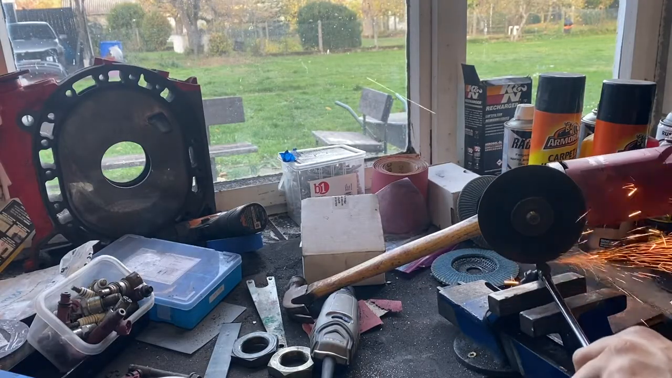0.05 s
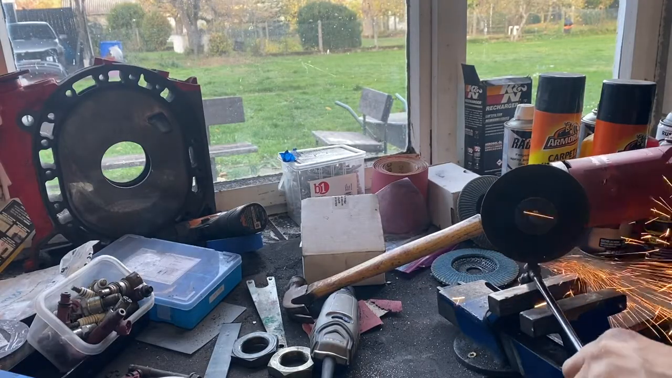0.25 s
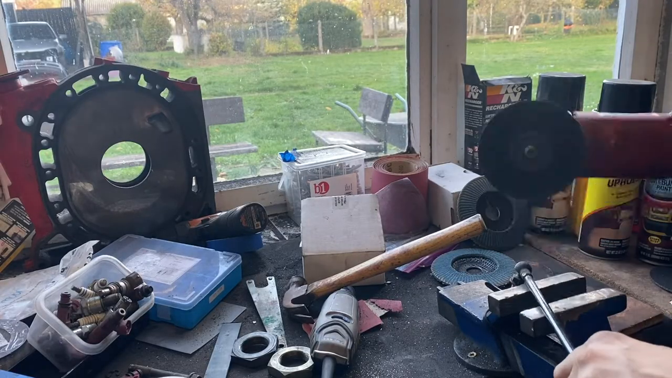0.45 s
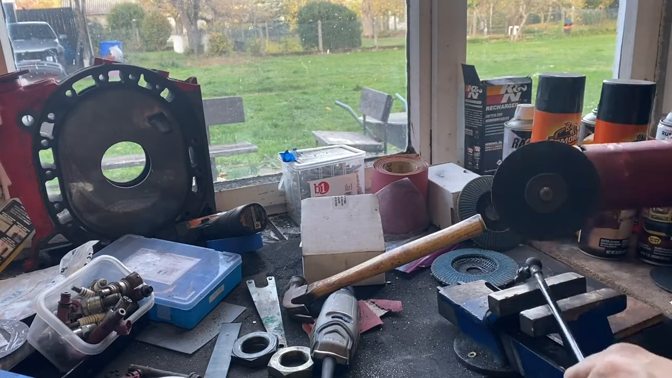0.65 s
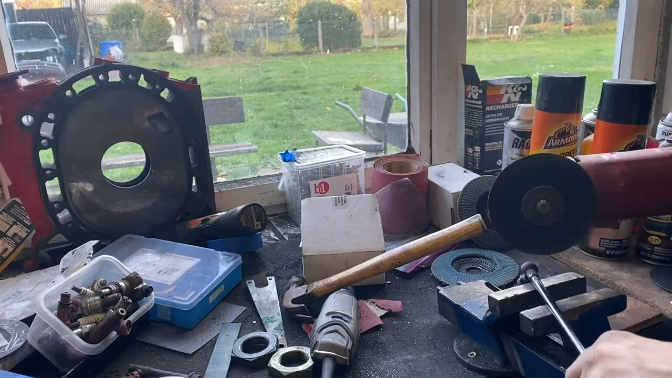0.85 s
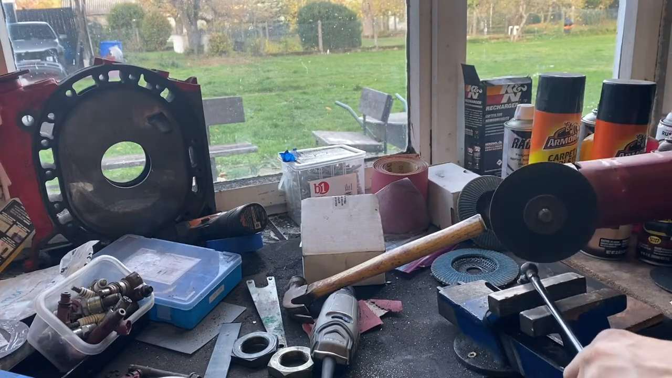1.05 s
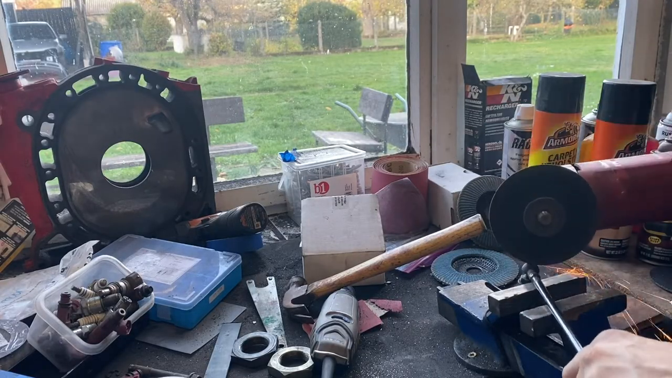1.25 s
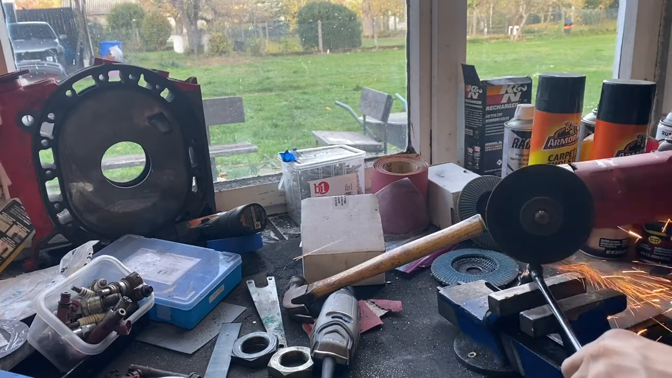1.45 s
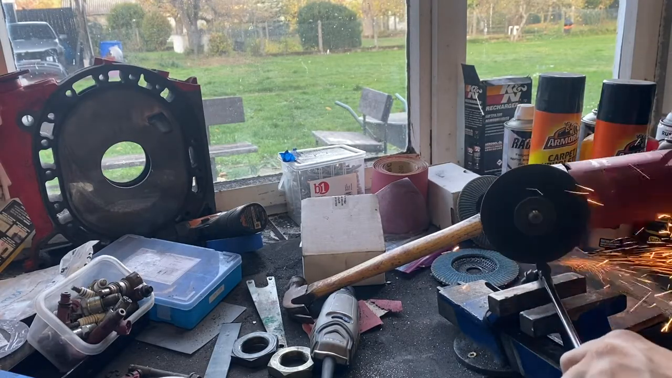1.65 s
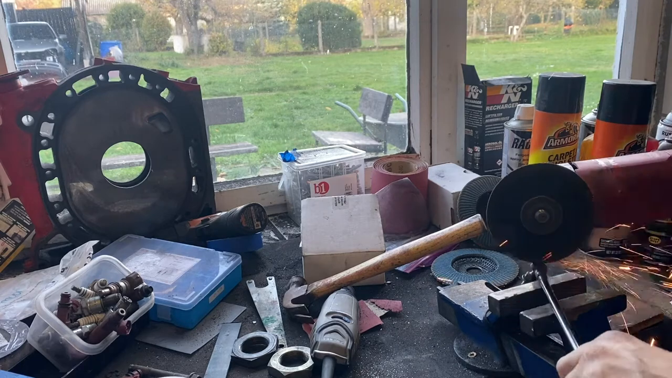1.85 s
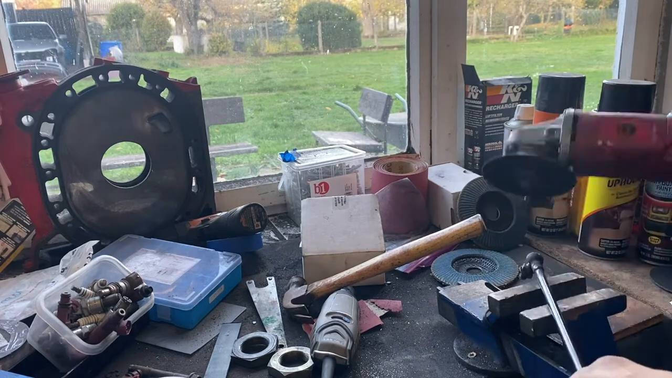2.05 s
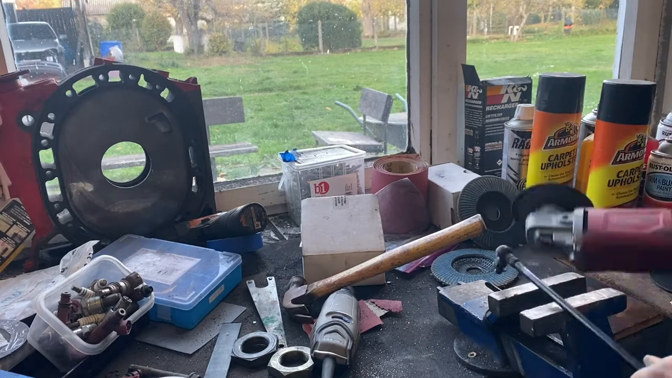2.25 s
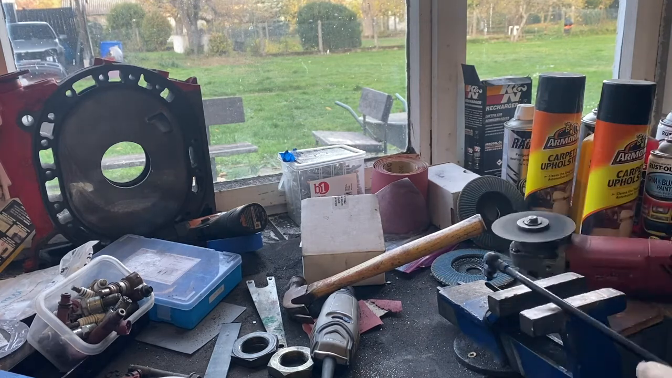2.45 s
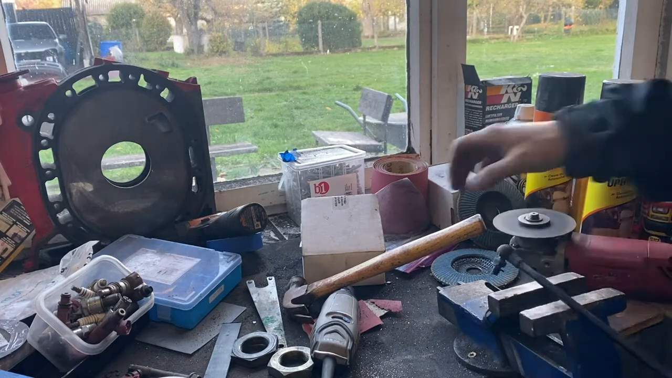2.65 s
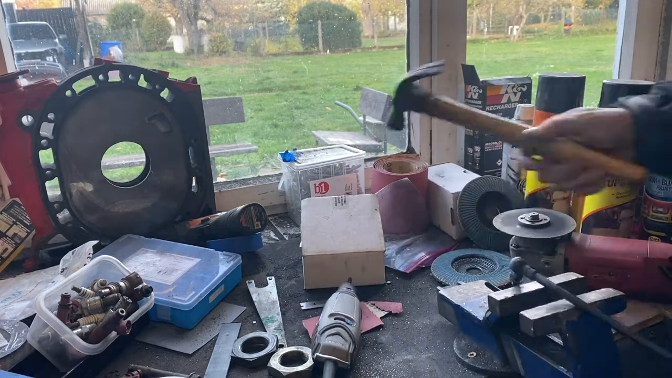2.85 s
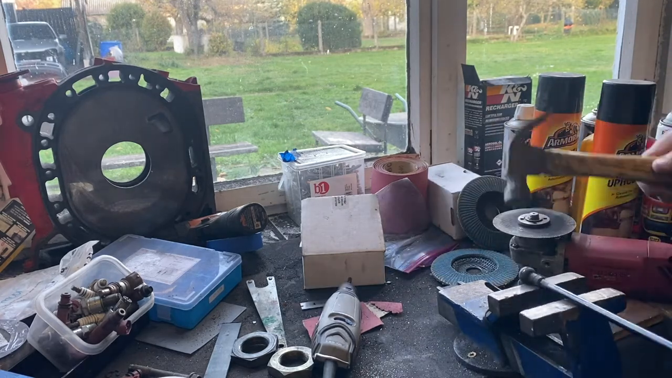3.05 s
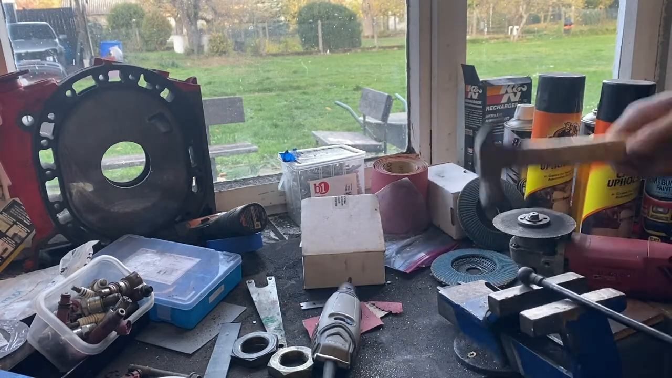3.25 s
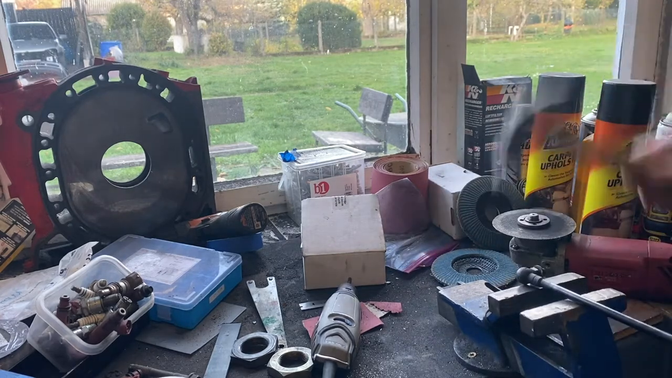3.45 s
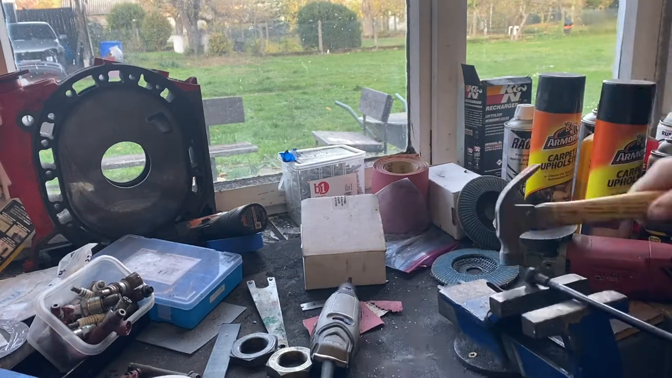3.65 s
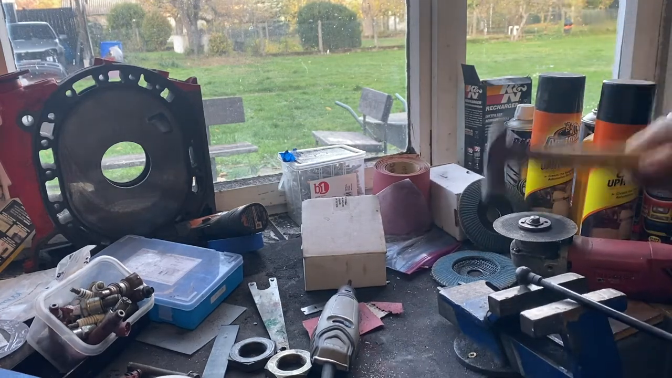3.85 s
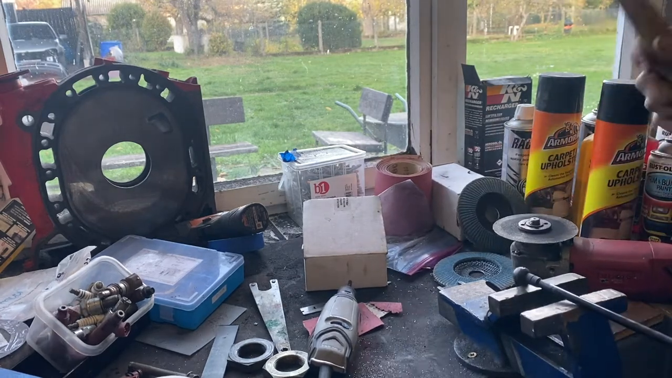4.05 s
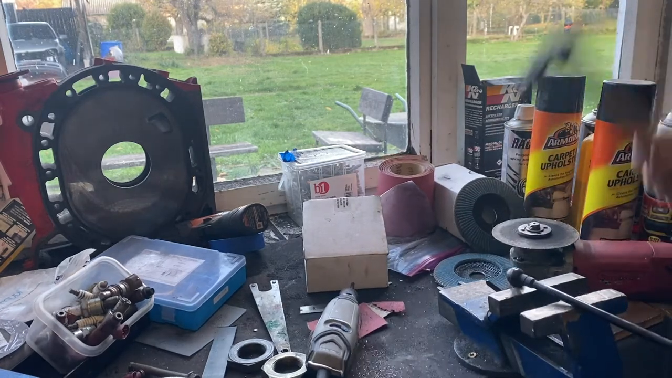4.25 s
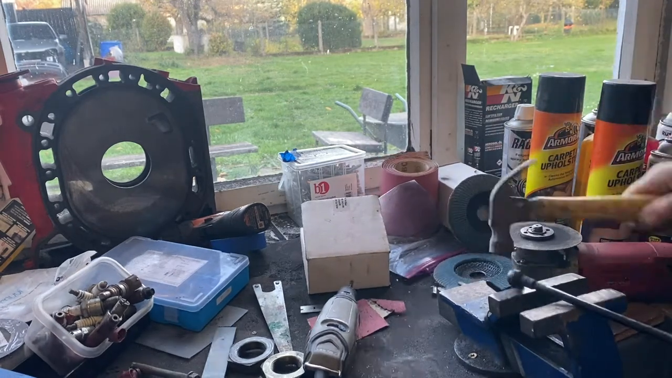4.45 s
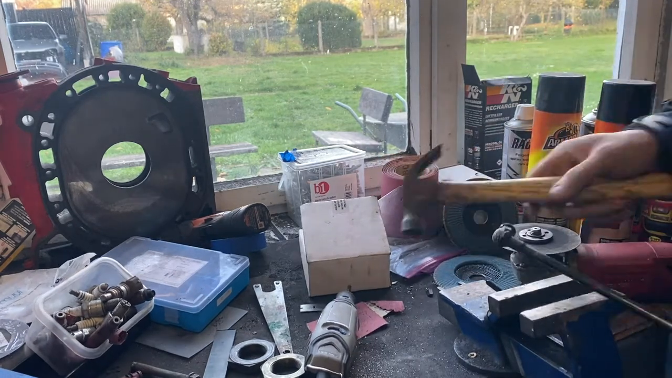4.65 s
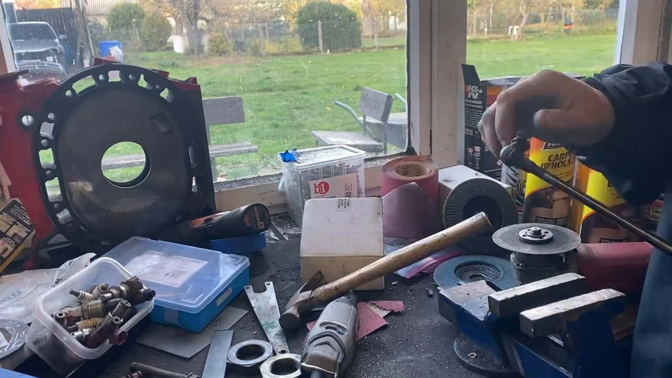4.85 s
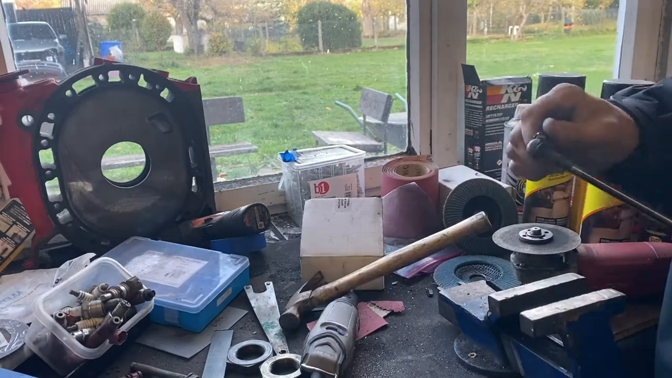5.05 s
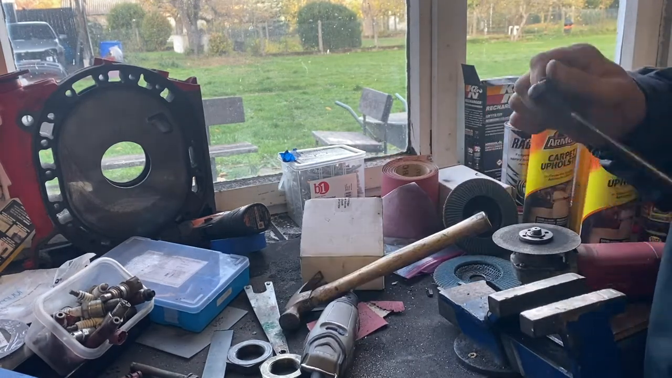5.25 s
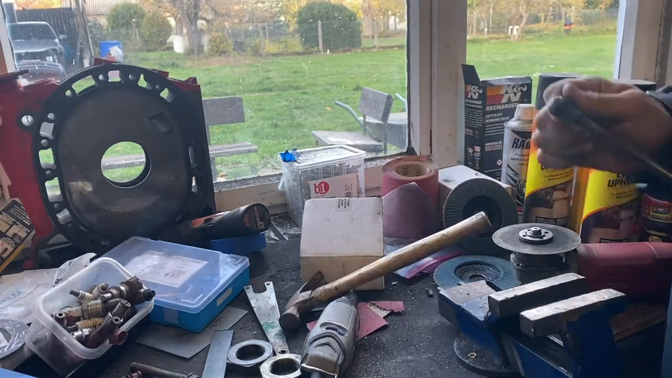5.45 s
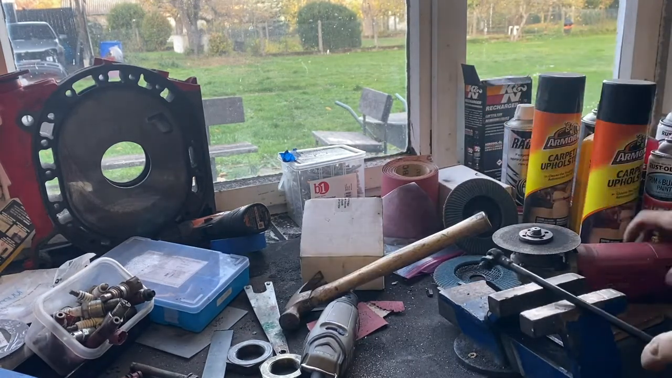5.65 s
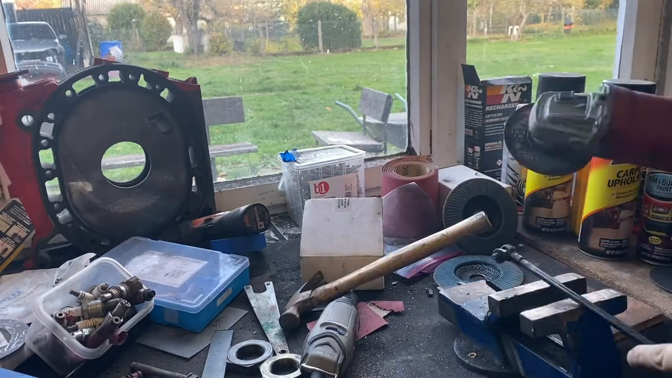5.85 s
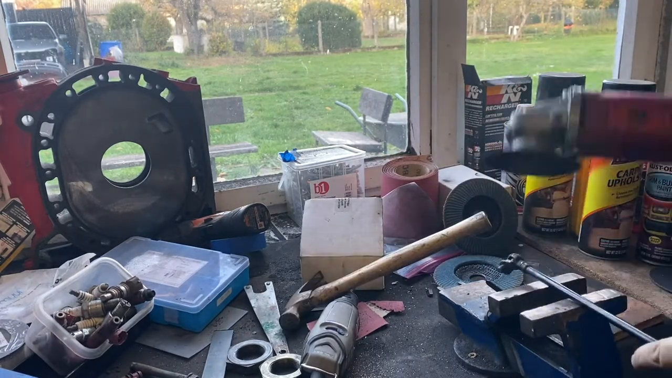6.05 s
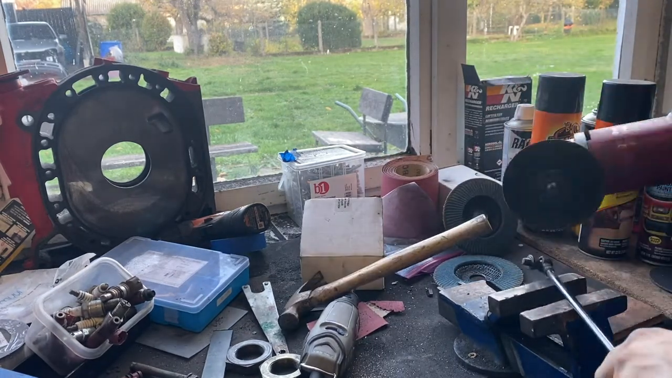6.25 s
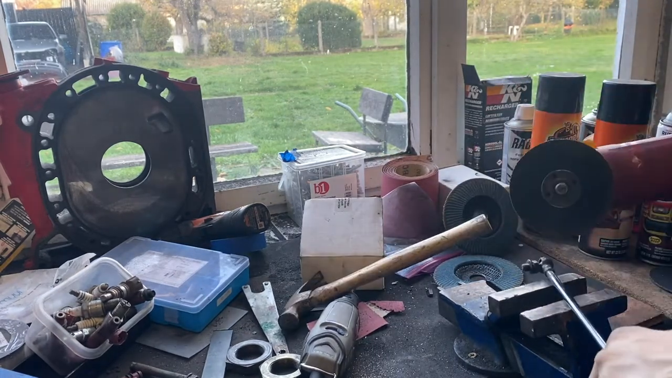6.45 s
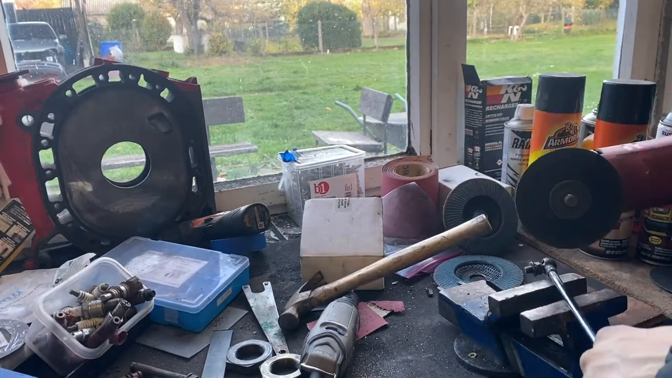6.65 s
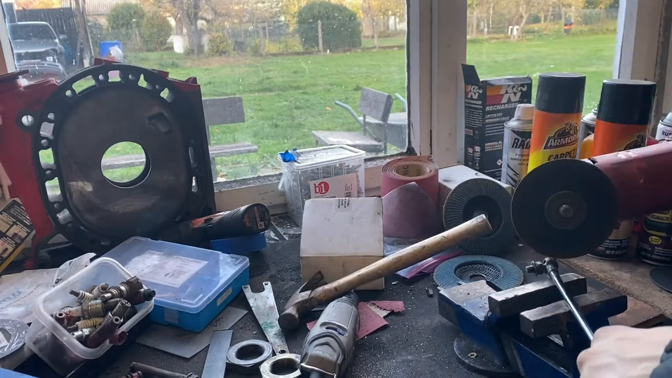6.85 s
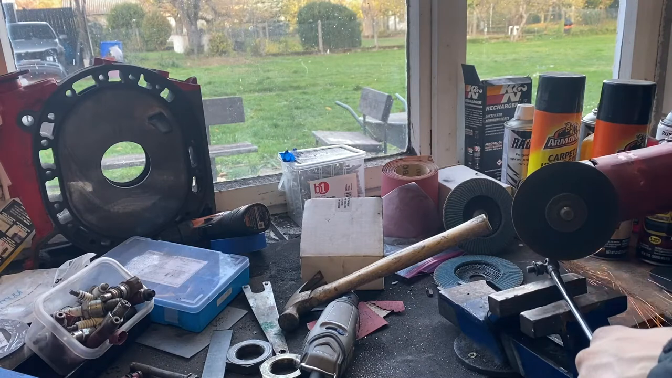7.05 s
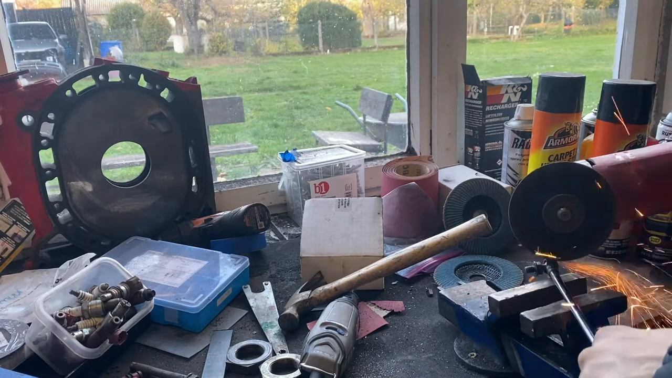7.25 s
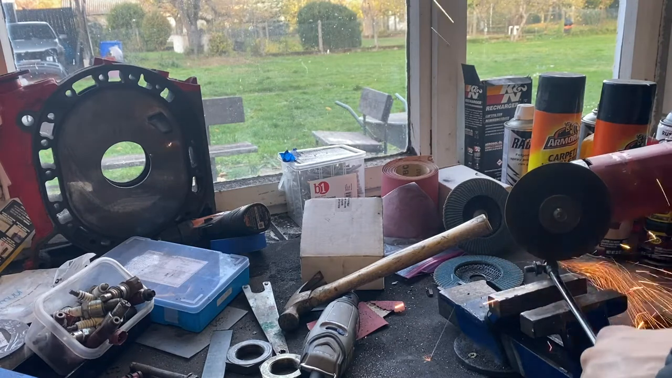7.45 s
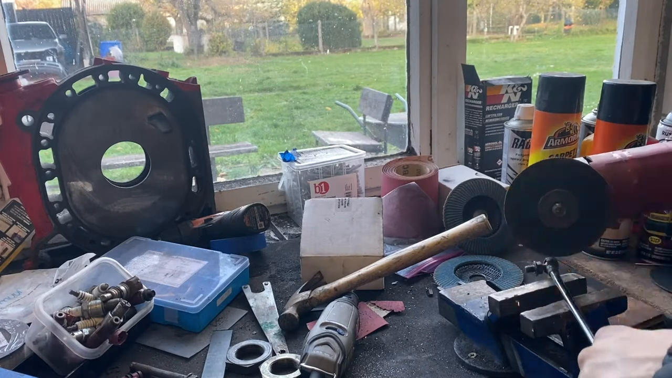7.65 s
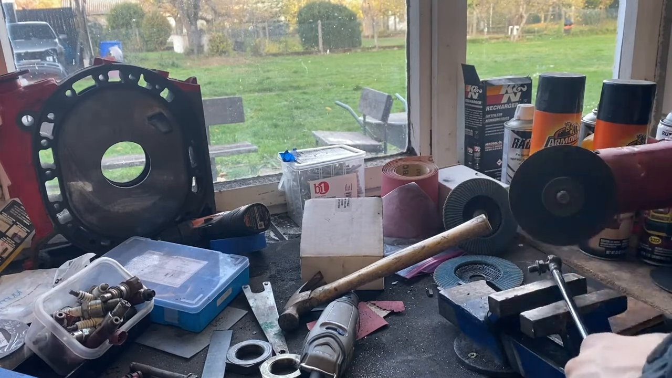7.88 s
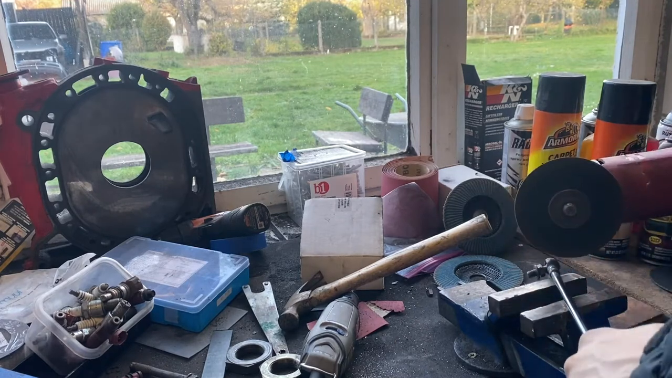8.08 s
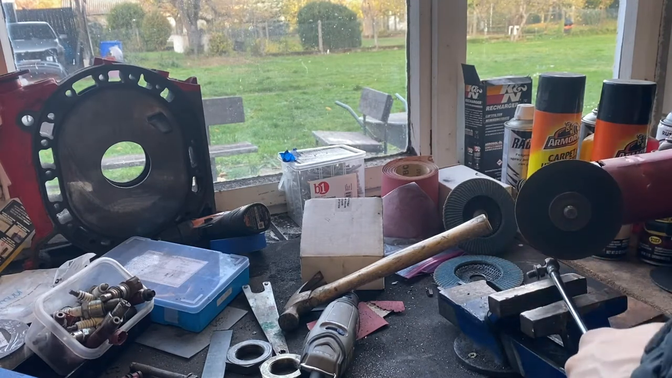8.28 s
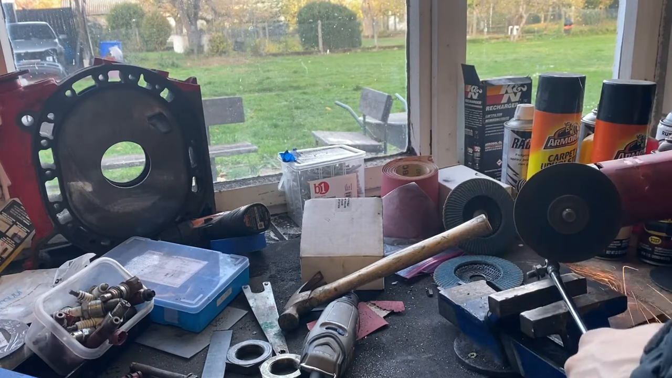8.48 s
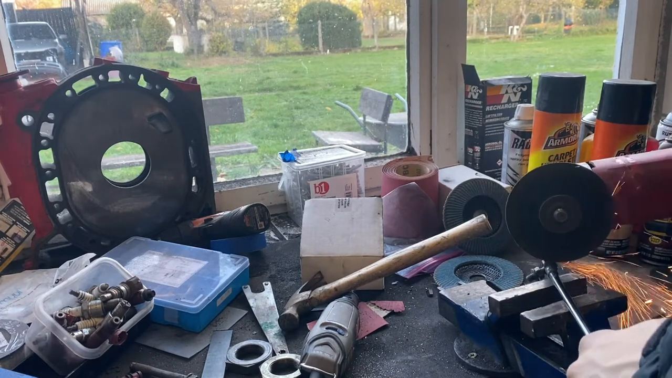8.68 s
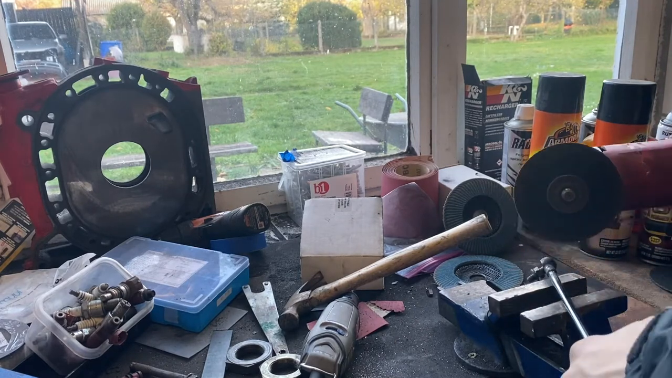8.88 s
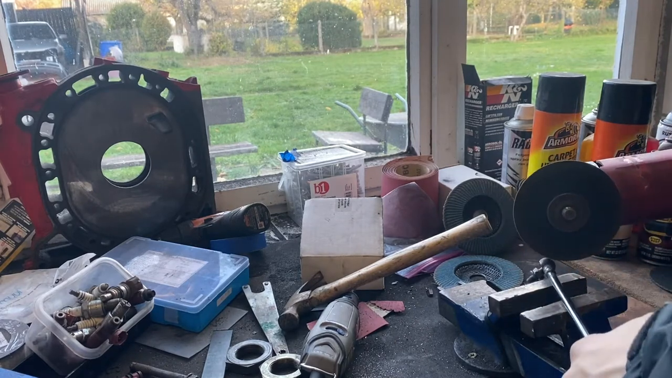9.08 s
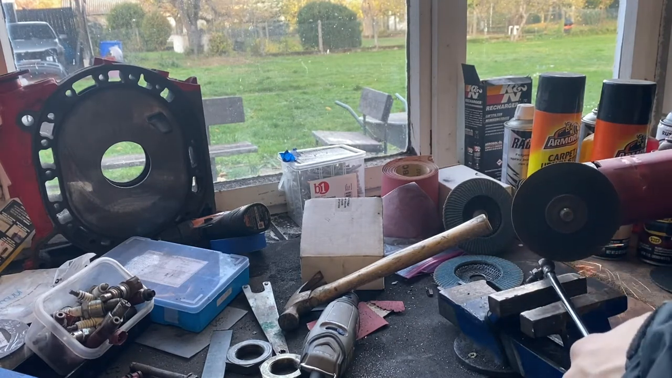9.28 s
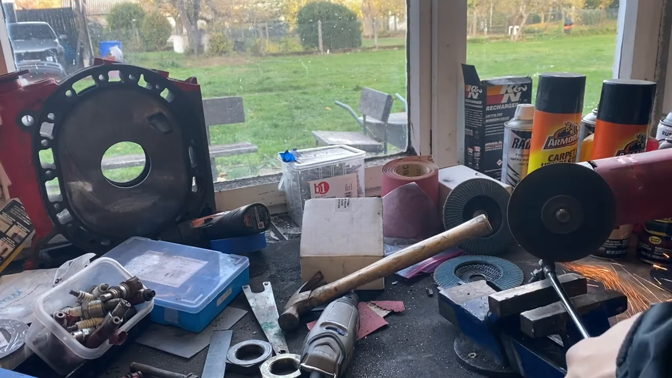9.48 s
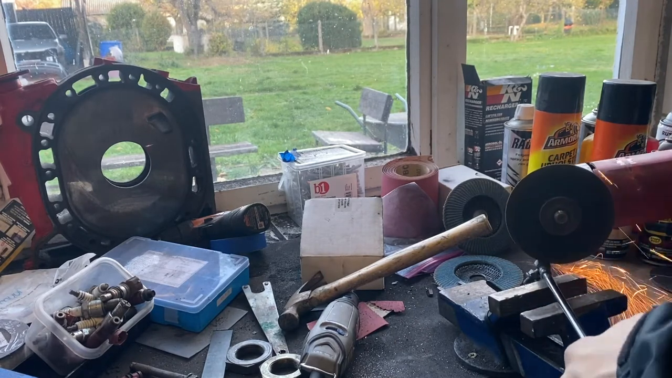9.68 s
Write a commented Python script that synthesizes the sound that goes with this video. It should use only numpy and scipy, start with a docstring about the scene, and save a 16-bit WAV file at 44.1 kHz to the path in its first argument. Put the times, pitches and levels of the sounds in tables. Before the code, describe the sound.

Harsh grinder cuts on clamped steel, a rattling coast to rest, a burst of fast hammering on a clattering bench, then whining grinding again.

```python
"""An angle grinder is heard biting a steel rod in a vise in a small workshop; it bites again and is laid down.
Quick hammer blows shake the bench, the hammer is dropped, and the grinder starts again for three more bites.
Fan air, hum and gear whine follow the motor's computed speed; grit noise rings the disc while it cuts.
Blows and knocks are decaying noise and ringing modes; a stereo microphone hears it all over a quiet room."""
import sys
import numpy as np
from scipy import signal
from scipy.fft import rfft, irfft, next_fast_len
from scipy.io import wavfile
from scipy.ndimage import map_coordinates

SR = 44100
rng = np.random.default_rng(int(sys.argv[2]) if len(sys.argv) > 2 else 0)


def transcribe(u):
    """Save the signal u as a 16-bit wav file named by the first command-line argument.

    u: samples, shape (n,) or (channels, n), limited to [-1, 1]; the rate is SR.
    q: integer samples, one column per channel.
    """
    v = np.clip(np.atleast_2d(u).T, -1, 1)
    q = np.round(v * 32767).astype(np.int16)
    wavfile.write(sys.argv[1], SR, q)


N = 428652
TIME = np.arange(N) / SR  # seconds
TOP_HZ = 16300  # the microphone's band limit

# Grinder switched on and held: on_s, off_s, level_db, surge_db (extra at the start), surge_length_s,
# strain_db (extra hum under the strain of starting)
RUNS = [(-1, .5, 0, 0, .5, 0), (.792, 1.955, 0, 4.5, .7, .5), (6.526, 10, .7, 5.1, .6, 3.5)]
FREE_HZ = 167.3  # disc turns a second in free air
SPIN_UP_S, COAST_S = .052, .5  # time constants with the power on and off
SPIN_UP_SHAPE = .78  # under 1: a leap at first, then a creep up to full speed
FRICTION_HZ, STALL_HZ = 24, 11  # dry friction stops the disc; its noise fades out below the stall speed


def unloaded_speed():
    """Turns a second: the motor nears its free speed while on, then coasts against drag and dry friction."""
    speed = np.zeros(N)
    for on, off, *_ in RUNS:
        driven_s, coasted_s = np.clip(TIME - on, 0, off - on), np.maximum(TIME - off, 0)
        approach = np.exp(-(driven_s / SPIN_UP_S) ** SPIN_UP_SHAPE)
        reached = FREE_HZ + (np.interp(on, TIME, speed) - FREE_HZ) * approach
        coasted = (reached + FRICTION_HZ) * np.exp(-coasted_s / COAST_S) - FRICTION_HZ
        speed = np.where(TIME < on, speed, np.maximum(coasted, 0))
    return speed


def still_turning(speed):
    """Share of the running noise left as the disc comes to rest."""
    return np.clip(speed / STALL_HZ, 0, 1) ** 2


def run_gain():
    """Each run starts with a surge in loudness that holds briefly and settles to the run's own level."""
    db = np.zeros(N)
    for on, _, level_db, surge_db, length, _ in RUNS:
        surge = surge_db / (1 + np.abs((TIME - on) / length) ** 5)
        db = np.where(TIME < on, db, level_db + surge)
    return amp(db)


# Air noise laws: driven_db, driven_power_of_speed, free_fan_db, free_fan_power_of_speed
RUSH_LAW = (-49, 4.5, -35.5, 0.9)
HISS_LAW = (-36.5, 2.06, -34.5, 0.64)


def air_gain(law, speed, power):
    """Air noise grows with a power of speed, with one law added while driven and one whenever the fan turns."""
    driven_db, driven_power, free_db, free_power = law
    pace = speed / FREE_HZ
    driven = amp(driven_db) * power * pace ** driven_power
    free = amp(free_db) * pace ** free_power
    return still_turning(speed) * run_gain() * (driven + free)


# Low and high fan air spectra: freq_hz, level_db (per Hz, relative)
RUSH = [(25, -39.5), (60, -23), (130, -15.5), (300, -7), (430, -2), (700, -4), (1200, -0.5), (2000, 1.5),
        (3000, -2.5), (5000, -17.5), (10000, -41)]
HISS = [(700, -33.5), (1700, -8), (2600, 1.5), (3300, 0.5), (4400, 0), (6500, 0), (8500, -2.5),
        (11500, -4.5), (14000, -7.5), (15700, -13), (16100, -45)]
CROWN_TEETH, PINION_TEETH = 36, 11  # the bevel gear between disc and armature


def fan_air(speed, power, turn):
    """The fan blows a low rush and a high hiss; the hiss pulses once per armature turn."""
    rush = air_gain(RUSH_LAW, speed, power) * amp(0.99 * wobble(30)) * spread(colour(RUSH))
    pulse = 1 + 0.32 * np.cos(turn * CROWN_TEETH / PINION_TEETH)
    hiss = air_gain(HISS_LAW, speed, power) * amp(0.68 * wobble(60)) * spread(colour(HISS), pulse)
    return rush + hiss


# Gear train tones: turn_multiple (rounded to whole), level_db (relative), power_of_speed
WHINE = [(21, -22, 2), (24, -24.5, 2), (36, -12, 20), (71.7, -14.5, 0.3)]
WHINE_LIFT_DB_PER_HZ = 1.5  # added per turn a second lost to the cut, against the fall with load and speed


def gear_whine(speed, power, load, turn):
    """Gear tones at whole multiples of the disc turn follow the hiss level and their own powers of speed."""
    pace = speed / FREE_HZ
    tones = 0
    for multiple, db, grows in WHINE:
        tones += amp(db + 3.2 * wobble(18)) * pace ** grows * np.sin(round(multiple) * turn)
    gain = air_gain(HISS_LAW, speed, power) * amp(-3.5 - 5 * load + WHINE_LIFT_DB_PER_HZ * sag())
    return np.sqrt(2) * tones * gain


# The hum and its overtones, in order: level_db
HUM_HARMONICS_DB = [0, -10, -12.5]
HUM_DB, HUM_SKIM_DB, HUM_DIG_DB = -38.5, -11.5, -4  # in free air; changes while skimming and dug in
GRAB_HUM_DB, GRAB_ARMATURE_DB = 8, -3.5  # as the disc grabs, the hum swells and the armature tone chokes
STRAIN_S, HUM_CUT_HZ = 0.17, 365  # the start strains this long; the housing radiates little hum below the cut


def spindle_hum(speed, power, load, dug, grab):
    """The spindle hums three times a turn, clean at full speed, shuddering once the disc is dragged down."""
    pace, hum_hz = speed / FREE_HZ, 3 * speed
    shudder = (.012 + 0.024 * dug + 0.18 * (1 - pace)) * wobble(140)
    strain_db = sum(db * held(on, on + STRAIN_S, BITE_ATTACK_S, RECOVER_S) for on, *_, db in RUNS)
    driven = power / (1 + (HUM_CUT_HZ / (hum_hz + 1)) ** 16)
    coasting = (1 - power) * amp(-5) * pace ** 2
    cut_db = GRAB_HUM_DB * grab + HUM_SKIM_DB * (load - dug) + HUM_DIG_DB * dug
    gain = (driven + coasting) * amp(HUM_DB + strain_db + cut_db + 1.4 * wobble(35))
    turn = phase(hum_hz * (1 + shudder))
    tones = sum(amp(db) * np.sin(k * turn + [[.35], [-.35]]) for k, db in enumerate(HUM_HARMONICS_DB, 1))
    return np.sqrt(2) * run_gain() * gain * tones


ARMATURE_DB, ARMATURE_DIG_DB = -38.5, -5  # tone while skimming before the surge; its change when dug in


def armature_tone(speed, load, dug, grab):
    """Under load the armature sounds at its own turning rate, geared up from the disc."""
    turn = phase(speed * CROWN_TEETH / PINION_TEETH * (1 + .005 * wobble(70)))
    level_db = ARMATURE_DB + ARMATURE_DIG_DB * dug + GRAB_ARMATURE_DB * grab + 2.0 * wobble(25)
    return np.sqrt(2) * run_gain() * load * amp(level_db) * np.sin(turn + [[.35], [-.35]])


def motor(speed, power, load, dug):
    """The fan, gears, spindle and armature share one speed, which grows unsteady under load."""
    unsteady = (.0026 + .003 * load) * wobble(70) + .012 * dug * wobble(160)
    turn = phase(speed * (1 + unsteady))
    grab = 0
    for start, _, _, _, skim, *_, length in BITES:
        grab += held(start + skim, start + skim + length, BITE_ATTACK_S, BITE_RELEASE_S)
    air = fan_air(speed, power, turn) + gear_whine(speed, power, load, turn)
    return air + spindle_hum(speed, power, load, dug, grab) + armature_tone(speed, load, dug, grab)


# The disc skims the steel, then digs in: start_s, end_s, ring_db, sizzle_db, skim_length_s, drone_db,
# lost_turns_hz (when dug in), shock_db (ring change at first contact), grab_length_s; layers trimmed below
BITES = [(-.5, 0.422, -27, -31, .3, -39.5, 14.3, -1.5, .05),
         (1.203, 1.913, -27, -30.5, .3, -46.5, 13.5, 1, .03),
         (6.992, 7.701, -28.5, -31.5, .22, -44, 13, 9.5, 0.13),
         (8.45, 8.867, -31, -33, .14, -45.5, 12, 1, .07),
         (9.328, 9.996, -29, -32, .15, -46, 10.5, -3, 0.05)]
BITE_ATTACK_S, BITE_RELEASE_S = 0.011, 0.016  # contact is made and lost
SKIM_SAG_HZ, DIG_S = 5.3, .035  # turns a second lost at a light touch; time constant of digging in
RECOVER_S = .06  # time constant of the speed coming back when the disc lifts


def sag():
    """Turns a second lost to the cut: a few while skimming, more once dug in, regained when the disc lifts."""
    total = 0
    for start, end, _, _, skim, _, lost, *_ in BITES:
        total += SKIM_SAG_HZ * held(start, end, BITE_ATTACK_S, RECOVER_S)
        total += (lost - SKIM_SAG_HZ) * held(start + skim, end, DIG_S, RECOVER_S)
    return total


# Disc, guard and gear head resonances: freq_hz, width_hz, level_db (relative)
DISC = [(1863, 33, 2), (1986, 140, 2), (2106, 230, -9), (2492, 230, -4.5), (2675, 230, -9.5)]
# Bright sizzle spectrum, also used for brushes and hammer snap: freq_hz, level_db (per Hz, relative)
SIZZLE = [(2500, -18.5), (4500, -14), (6000, 2), (7000, -0.5), (8800, -7), (10300, 0), (11400, -1),
          (12500, 0), (14000, -2), (15700, -7.5), (16100, -46)]
BITE_FADE_DB_PER_S = 1.5  # the ring eases as the groove deepens
BITE_SHOCK_S = .07  # time constant of the change at first contact
RING_WANDER, WANDER_RATE = .013, 20  # moving contact bends pitch by about this share; knots a second
DRONE_DIG_DB = -9  # the groove steadies the warped disc


def disc_ring(pressure):
    """Grit rings the disc and guard; as the contact point wanders, levels shift and the pitch bends."""
    ring = 0
    for mode in DISC:
        strength = amp(mode[2] + 1.2 * wobble(40)) * np.sqrt(mode[1])
        ring += strength * spread(body([mode]), pressure)
    bent = np.arange(N) + np.cumsum(RING_WANDER * wobble(WANDER_RATE))
    return np.array([map_coordinates(side, [bent], mode="mirror") for side in amp(-1.6) * unit(ring)])


def disc_squeal(turn):
    """Turn overtones come and go as they cross the disc's resonances; the even ones are stronger."""
    overtones = sum(amp(3.5 * wobble(28) - 4 * (k % 2)) * np.sin(k * turn) for k in range(11, 19))
    return amp(-7.5) * unit(filtered(overtones, body(DISC)))


def cutting(speed, dug):
    """Grit strikes in clumps, hardest twice a turn of the warped disc, which drones and rasps on that beat."""
    turn = phase(speed * (1 + .003 * wobble(20) + .005 * wobble(300)))
    beat = 2 * turn
    clumps = amp(1.3 * wobble(110) + 2.4 * wobble(700))
    pressure = clumps * (1 + 0.51 * np.cos(beat) + .3 * np.cos(2 * beat))
    # the disc radiates little below its first mode
    rasp = filtered(disc_ring(pressure) + disc_squeal(turn), lambda f: 1 / (1 + (1600 / (f + 1)) ** 10))
    drone = amp(1 + DRONE_DIG_DB * dug + 1.3 * wobble(20)) * np.sin(beat)
    sizzle = amp(1.5) * spread(colour(SIZZLE), pressure)
    rod_modes = [(6800, 220, -7.5), (11430, 100, 1.5), (12400, 200, 0.0)]  # freq_hz, width_hz, level_db
    shrill = amp(-5.0) * spread(body(rod_modes), pressure)  # the scraped rod's high modes
    ring_gain = sizzle_gain = drone_gain = 0
    for start, end, ring_db, sizzle_db, _, drone_db, _, shock_db, _ in BITES:
        contact = held(start, end, BITE_ATTACK_S, BITE_RELEASE_S)
        from_middle = np.clip(TIME, start, end) - (start + end) / 2
        shock = amp(shock_db * held(start, start, BITE_ATTACK_S, BITE_SHOCK_S))
        ring_gain += contact * shock * amp(ring_db - BITE_FADE_DB_PER_S * from_middle)
        sizzle_gain += contact * amp(sizzle_db)
        drone_gain += contact * amp(drone_db)
    return ring_gain * rasp + sizzle_gain * (sizzle + shrill) + drone_gain * drone


# Slack gears while coasting: turns_hz, level_db
CHATTER = [(3, -50), (11.5, -46.5), (26, -45), (43, -46.5), (62, -35.5), (76, -35), (98, -45.5), (130, -68)]
# Gears take up their slack: start_s, level_db (before trim)
CLACKS = [(2.387, -28), (2.414, -37), (2.4327, -24.5), (2.4548, -31.5), (6.529, -16.5), (6.562, -20.5)]
# Gear head resonances: freq_hz, width_hz, level_db (relative)
GEARBOX = [(2000, 120, 1), (2620, 420, -6), (3250, 370, -14.5), (5800, 1200, -29)]
# Bench shaken by the gears: freq_hz, level_db (per Hz, relative)
RUMBLE = [(30, -6), (130, 0), (300, -2), (450, 1), (700, -3.5), (1200, -19), (3000, -48.5)]


def gears(speed, power):
    """Unloaded teeth screech at their falling mesh rate, then rattle and shake the bench as brushes hiss."""
    meshing = np.clip((speed - 45) / 20, 0, 1)  # 1 above 65 turns a second, 0 below 45
    rattle = amp(4.5 * wobble(260) + .6 * wobble(35))
    chatter = amp(-2.0 - 8.2 * meshing) * spread(body(GEARBOX), rattle)
    mesh = phase(CROWN_TEETH * speed * (1 + .028 * wobble(500)))
    tone = np.sin(mesh) + amp(-19) * np.sin(2 * mesh)
    screech = amp(2.7 * wobble(59.9)) * meshing * wobble(420) * tone
    brushes = amp(1.0) * (1 - meshing) * spread(colour(SIZZLE))
    rumble = amp(-5.0 + 1.4 * wobble(30)) * (1 - meshing) * spread(colour(RUMBLE))
    s, db = np.transpose(CLACKS)
    teeth = spread(body(GEARBOX)) + amp(-12.0) * spread(colour(HISS))
    clacks = decays(s, db - 2.5, attack=0.00055, t60=0.056) * teeth
    slack = (1 - power) * still_turning(speed) * amp(along(CHATTER, speed))
    return slack * (chatter + screech + brushes + rumble) + clacks


# Hammer on steel, levels before each layer's trim: start_s, crack_db, bench_thud_db, vise_db, high_ring_db,
# rise_s, ping_pitch_hz (of the spot that is hit), ping_db
BLOWS = [(3.39, -14.5, -28.5, -38.5, -30, .0012, 5500, -35),
         (3.508, -11.5, -29, -35.5, -33.5, .001, 4500, -35),
         (3.601, -7.5, -30, -24.5, -33, .0005, 3400, -22),
         (3.693, -8.5, -31.5, -21.5, -33, .0002, 3750, -11),
         (3.782, -11, -30.5, -25.5, -28.5, .0003, 2850, -26.5),
         (3.869, -8, -30.5, -18, -24, .0003, 3750, -9), (3.961, -8.5, -27, -32, -31, .0013, 4600, -27.5),
         (4.043, -8, -29, -18.5, -28, .0003, 3650, -18.5), (4.131, -8, -25.5, -17, -24, .0003, 5900, -17),
         (4.217, -7.5, -29, -22, -26.5, .0003, 2200, -16),
         (4.311, -11, -25, -27.5, -26.5, .0012, 4550, -30.5),
         (4.402, -15.5, -25.5, -22, -17.5, .0002, 6400, -17.5),
         (4.488, -8.5, -26, -17.5, -21, .0003, 3350, -17)]
# Rod and vise resonances: freq_hz, width_hz, level_db (relative)
VISE = [(1730, 250, -6.5), (2480, 130, 0.5), (3700, 200, 5.5), (4620, 200, -0.5), (6000, 120, -5.5),
        (7430, 150, -7.5)]
# Hammer head and rod ring on: freq_hz, level_db (relative), t60_s
STEEL = [(3752, -17, 0.14), (4550, -12.5, 0.16), (4753, -14, .15), (5290, -15, .14), (6350, -17.5, .14),
         (7550, -3, .17), (8250, -3, 0.092), (10380, -5.5, .07), (10900, 0, 0.15), (11600, -13.5, .12),
         (12300, -9.5, .12), (14350, -11, .07), (15010, -4.5, .11), (15130, -6.5, .11)]
# Crack, loose tools and bench top spectra: freq_hz, level_db (per Hz, relative)
CRACK = [(100, -11), (400, -5.5), (1000, 2.5), (2000, 0), (3000, -9), (5000, -11), (8000, -7.5),
         (11000, -10), (14000, -15.5), (16000, -24)]
CLATTER = [(100, -9.5), (350, 6), (600, 1), (1100, 0), (2000, -3), (4000, -7), (8000, -11.5), (12000, -18),
           (16000, -32)]
BENCH = [(20, -13.5), (38, -5.5), (70, -3), (125, -0.5), (190, -2.5), (310, -1), (480, -14), (900, -15),
         (3000, -51)]
# The bench top booms: freq_hz, width_hz, level_db (relative)
BENCH_MODE = [(188, 7.8, 0)]
PING_T60_S = 0.014  # the hammer smothers the ping at once
CLATTER_DB, CLATTER_GROWS = -17.5, 0.38  # before trim: level at a 0 dB crack; dB gained per dB of crack
JINGLE_DB, JINGLE_T60_S = -23, 0.17  # each loose tool relative to the clatter, before trim
RING_BLUR_HZ = 18  # the clamped steel buzzes, which widens its lines


def hammering():
    """Each blow cracks, rings steel, thuds the bench and leaves the loose tools and the room clattering."""
    s, crack_db, thud_db, vise_db, ring_db, rise, ping_hz, ping_db = np.transpose(BLOWS)
    full = s + .0015  # crack, snap, vise, pings and ringing sound 1.5 ms after each blow's start
    crack = decays(full, crack_db - 3.3, attack=rise, t60=0.032) * spread(colour(CRACK))
    snap = decays(full, ring_db + 12.5, attack=rise, t60=0.0075) * spread(colour(SIZZLE))
    vise = decays(full, vise_db + 5.5, attack=.0006, t60=0.027) * spread(body(VISE))
    clatter_db = CLATTER_DB + CLATTER_GROWS * crack_db
    clatter = decays(s, clatter_db - .7, attack=0.0024, t60=0.2) * spread(colour(CLATTER))
    bench = spread(colour(BENCH)) + amp(-11) * spread(body(BENCH_MODE))
    thud = decays(s, thud_db + 6.5, attack=0.0052, t60=0.26) * bench
    ring = np.zeros((2, N))
    for when, steel_db, loose_db in zip(full, ring_db, clatter_db):
        # loose tools ring at random pitches from 900 to 6300 Hz
        tools = [(hz, JINGLE_DB, JINGLE_T60_S) for hz in 900 * 7 ** rng.random(size=16)]
        add(ring, when, amp(steel_db - 3.5) * struck(STEEL, scatter_db=2.5))
        add(ring, when, amp(loose_db + 2.0) * struck(tools, scatter_db=4.0))
    pings = np.zeros((2, N))
    for when, hz, db in zip(full, ping_hz, ping_db):
        add(pings, when, struck([(hz, db, PING_T60_S)], scatter_db=1))
    return crack + snap + vise + pings + clatter + thud + ring * amp(2 * wobble(160))


# Tools meet the bench and the vise, levels before trim: start_s, thud_db, click_db, steel_clink_db
KNOCKS = [(2.349, -29, -32, -48.5), (2.53, -51, -43.5, -59.5), (2.798, -47, -62, -72),
          (2.828, -43.5, -54.5, -65.5), (4.774, -31.5, -44, -66), (4.815, -28, -35, -60),
          (4.862, -32.5, -38, -67), (4.877, -29.5, -44, -70), (5.66, -59.5, -55, -53),
          (5.716, -69, -62.5, -61), (6.211, -46, -61, -80)]
# Click spectrum: freq_hz, level_db (per Hz, relative)
CLICK = [(200, 0.5), (600, 9.5), (1200, -0.5), (2500, -3), (4500, -12), (8000, -16), (16000, -24)]
# The loose rod clinks: freq_hz, level_db (relative), t60_s
ROD = [(303, -4, 0.22), (1330, -8, .09), (1720, -4.5, .1), (2164, -7.5, .11), (2966, -4, 0.12),
       (3736, -5, .07), (4183, 0, .06), (4484, 0.5, 0.077), (6142, -8.5, .06), (7693, -5, .08)]
BENCH_SOFT_HZ = 524  # a tool laid down thuds little above this
ROD_BLUR_HZ = 90  # the rod chatters against the jaws, which smears its lines


def bench_work():
    """Tools put down and picked up thud softly, excite the room's low modes, click and clink the rod."""
    s, thud_db, click_db, clink_db = np.transpose(KNOCKS)
    soft = lambda f: colour(BENCH)(f) * f / (f + 80) / (1 + (f / BENCH_SOFT_HZ) ** 4)
    thuds = decays(s, thud_db + 4.5, attack=0.0081, t60=0.132) * spread(soft)
    room_modes = [(118.0, 18, 0), (170.0, 11, -1)]  # freq_hz, width_hz, level_db
    boom = decays(s, thud_db - 6.5, attack=0.0027, t60=0.37) * spread(body(room_modes))
    clicks = decays(s, click_db, attack=0.00091, t60=0.16) * spread(colour(CLICK))
    clinks = np.zeros((2, N))
    for when, db in zip(s, clink_db):
        add(clinks, when, amp(db - 0.5) * struck(ROD, scatter_db=4, blur_hz=ROD_BLUR_HZ))
    return thuds + boom + clicks + clinks


# Small ticks and taps of handled tools and the grinder's switch: start_s, level_db, pitch_hz,
# width_octaves, t60_s
TICKS = [(2.896, -39.5, 7800, 0.57, 0.045), (4.814, -32, 6500, 1.6, 0.013),
         (4.943, -38.5, 4500, 2.8, 0.0088), (5.781, -53, 544, 0.65, 0.099), (5.781, -62, 1700, 1.6, 0.06),
         (5.872, -64, 1600, .9, .05), (5.932, -57, 2300, 0.89, 0.033), (6.069, -54.5, 2280, 0.59, 0.031),
         (6.098, -62, 934, .3, 0.075), (6.142, -66, 2800, .6, 0.054), (6.162, -64, 1000, .35, .09),
         (6.188, -57, 2100, .5, 0.039), (6.298, -62, 2390, 0.76, 0.036), (6.429, -61, 3000, 1.8, 0.026),
         (6.524, -36, 2200, 1.9, .05), (6.5308, -20.5, 3666, 2.9, 0.057)]


def handling():
    """Light contacts are short decaying bands of noise, each with its own pitch and length."""
    track, t = np.zeros((2, N)), np.arange(SR // 5) / SR
    for s, db, hz, octaves, t60 in TICKS:
        edges = np.minimum(hz * 2 ** (np.array([-.5, .5]) * octaves), TOP_HZ)
        band = signal.butter(2, edges, "bandpass", fs=SR, output="sos")
        mid, side = unit(signal.sosfilt(band, rng.standard_normal((2, len(t)))))
        envelope = amp(db - 60 * t / t60) * (1 - np.exp(-t / .001))
        add(track, s, envelope * (mid + side * [[.5], [-.5]]))
    return track


# Sleeves and hands: middle_s, length_s, level_db (before trim)
RUSTLES = [(3.076, .11, -71.5), (5.229, 0.1, -71), (5.351, .07, -75), (5.553, 0.092, -70.5),
           (6.024, 0.67, -71.5)]
# Clothing spectrum: freq_hz, level_db (per Hz, relative)
SLEEVE = [(100, -1), (500, 0.5), (2200, -3.5), (4000, -4.5), (8000, -6.5), (12000, -8), (16000, -16.5)]


def clothing():
    """Cloth rustles in faint swells of rough noise."""
    swells = sum(amp(db) * np.exp(-(2 * (TIME - middle) / length) ** 2) for middle, length, db in RUSTLES)
    return swells * amp(2 * wobble(45) + 2.7 * wobble(400) - 0.5) * spread(colour(SLEEVE))


# Quiet room spectrum: freq_hz, level_db (per Hz, relative)
QUIET = [(20, -3), (60, -1), (130, 3), (250, -6.5), (700, -11), (2500, -21), (8000, -22.5), (16000, -29)]


def quiet_room():
    """Steady faint noise lies behind everything."""
    return amp(-72.0) * spread(colour(QUIET))


def amp(db):
    """Decibels to gain."""
    return 10 ** (np.asarray(db) / 20)


def unit(x):
    """Scaled to rms 1."""
    return x / np.sqrt(np.mean(x ** 2) + 1e-20)


def along(points, hz):
    """(Hz, value) points read on a log axis."""
    f, v = np.transpose(points)
    return np.interp(np.log(hz + 1), np.log(f + 1), v)


def wobble(rate):
    """A smooth random curve, rate knots a second."""
    return map_coordinates(rng.standard_normal(int(N * rate / SR) + 4), [TIME * rate])


def phase(hz):
    """Running angle of a changing frequency."""
    return 2 * np.pi * np.cumsum(hz) / SR


def held(start, end, attack, release):
    """Envelope that rises at start, holds, and dies away after end."""
    rise = 1 - np.exp(-np.maximum(TIME - start, 0) / attack)
    return rise * np.exp(-np.maximum(TIME - end, 0) / release)


def decays(times, levels_db, attack, t60):
    """Envelope of blows that rise quickly and die away, summed as power."""
    power, t = np.zeros(N + SR), np.arange(SR) / SR
    fall = amp(-60 * t / t60)
    for s, db, rise in zip(times, levels_db, np.broadcast_to(attack, len(times))):
        shape = (1 - np.exp(-t / rise)) * fall
        power[round(s * SR):][:SR] += (amp(db) * shape) ** 2
    return np.sqrt(power[:N])


def filtered(x, response):
    """x times a complex response of frequency."""
    m = next_fast_len(N + 8192)
    return irfft(rfft(x, m) * response(np.fft.rfftfreq(m, 1 / SR)), m)[..., :N]


def colour(points):
    """The response of a spectrum table."""
    return lambda f: amp(along(points, f))


def body(modes):
    """The causal response of (Hz, width, dB) resonances, with alternating signs."""
    def response(f):
        total = 0
        for k, (c, w, db) in enumerate(modes):
            total = total + (-1) ** k * amp(db) * 1j * f * w / (c * c - f * f + 1j * f * w)
        return total
    return response


# Likeness of the two sides: freq_hz, correlation (1 is alike)
ALIKE = [(60, 1), (250, .87), (500, 0.57), (1000, 0.43), (2000, 0.72), (3200, 0.24), (4500, 0.21),
         (5400, 0.13), (6300, 0.32), (7200, 1)]


def spread(response, force=1):
    """Stereo noise of rms 1 through a response, driven by force; near walls make the sides partly unlike."""
    def mid_side(f):
        turn = np.arccos(np.clip(along(ALIKE, f), -1, 1)) / 2
        return response(f) * np.array([np.cos(turn), np.sin(turn)])
    mid, side = filtered(force * rng.standard_normal((2, N)), mid_side)
    return unit(np.array([mid + side, mid - side]))


def struck(modes, scatter_db, blur_hz=RING_BLUR_HZ):
    """One ringing of (Hz, dB, t60) modes, with strengths varied per blow and phases varied per side."""
    t = np.arange(SR // 4) / SR
    hz, db, t60 = np.transpose(modes)[:, :, None]
    level_db = db + scatter_db * rng.standard_normal(hz.shape)
    gain = amp(level_db - 60 * t / t60) * (1 - np.exp(-t / .001))
    detuned = hz * (1 + 0.0011 * rng.standard_normal(hz.shape))
    angle = 2 * np.pi * (detuned * t + rng.random(hz.shape))
    # a random walk in phase widens each line
    blur = np.cumsum(rng.standard_normal(angle.shape), axis=1) * np.sqrt(2 * np.pi * blur_hz / SR)
    side_phase = 0.56 * rng.standard_normal((2, len(hz), 1))
    return np.sum(gain * np.sin(angle + blur + side_phase), axis=1)


def add(track, s, sound):
    """Mix a short stereo sound into a track at time s."""
    track[:, round(s * SR):][:, :sound.shape[1]] += sound


POWER_FADE_S = 0.02  # time constant of the driven noise when the switch is let go


def scene():
    """The grinder, the hammer and the bench over a quiet room."""
    power = np.clip(sum(held(on, off, 0.031, POWER_FADE_S) for on, off, *_ in RUNS), 0, 1)
    load = sum(held(start, end, BITE_ATTACK_S, BITE_RELEASE_S) for start, end, *_ in BITES)
    dug = sum(held(start + skim, end, DIG_S, BITE_RELEASE_S) for start, end, _, _, skim, *_ in BITES)
    speed = unloaded_speed() * (1 - sag() / FREE_HZ)
    grinder = motor(speed, power, load, dug) + cutting(speed, dug) + gears(speed, power)
    return grinder + hammering() + bench_work() + handling() + clothing() + quiet_room()


# Level between the sides: freq_hz, left_minus_right_db
LEAN = [(60, .2), (250, -1.8), (500, -1), (1000, .7), (2000, 2), (3500, 2.6), (6000, 1.3), (8000, 0)]
# The left treble lags the right: freq_hz, lag_cycles
TWIST = [(7100, 0), (9100, .5), (11150, 1), (13250, 1.5), (15200, 2)]


def record(dry):
    """The stereo microphone tilts level and phase between its sides by frequency and ends at its band limit."""
    sides = np.array([[.5], [-.5]])  # each side takes half the difference
    lean = lambda f: amp(sides * along(LEAN, f))
    twist = lambda f: np.exp(-2j * np.pi * sides * along(TWIST, f))
    return filtered(dry, lambda f: lean(f) * twist(f) * (f < TOP_HZ))


dry = scene()
out = record(dry)
transcribe(out)
```